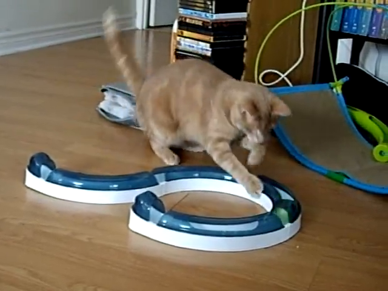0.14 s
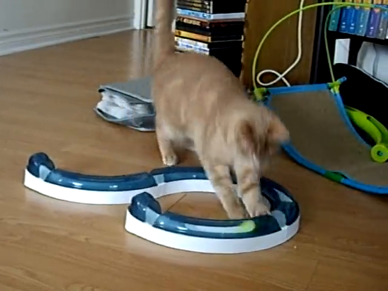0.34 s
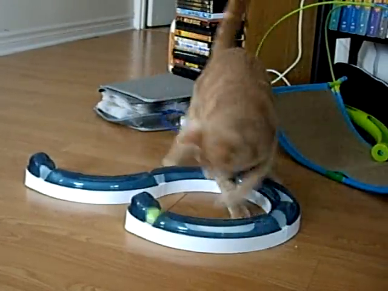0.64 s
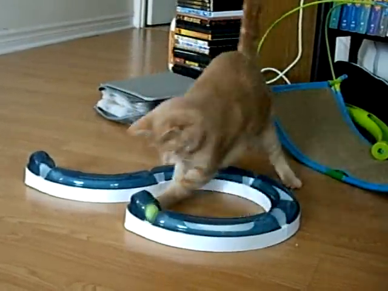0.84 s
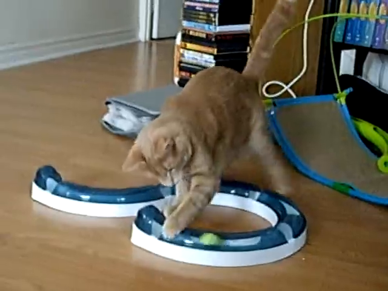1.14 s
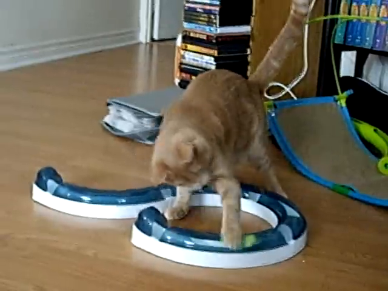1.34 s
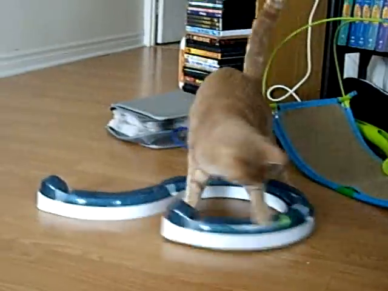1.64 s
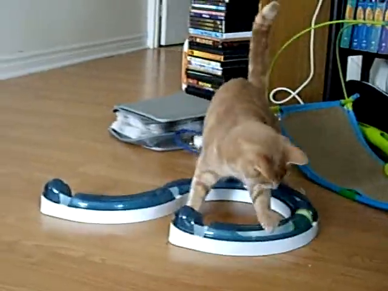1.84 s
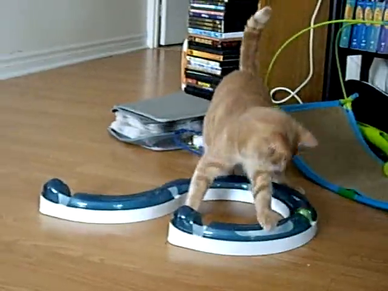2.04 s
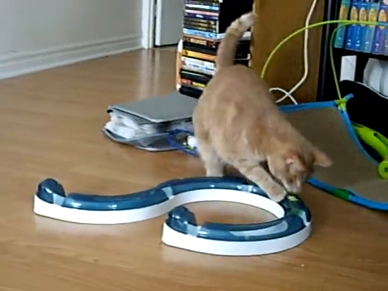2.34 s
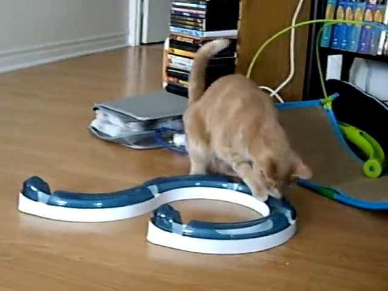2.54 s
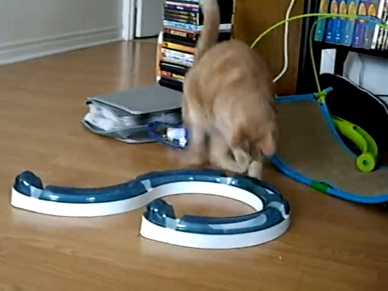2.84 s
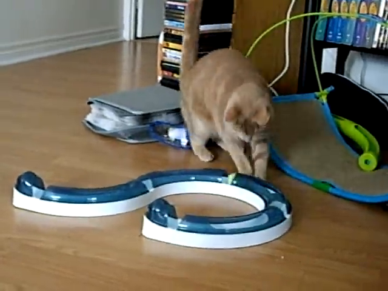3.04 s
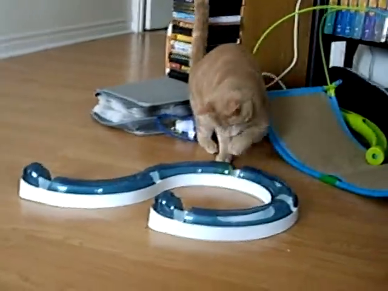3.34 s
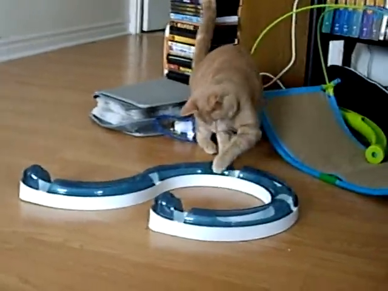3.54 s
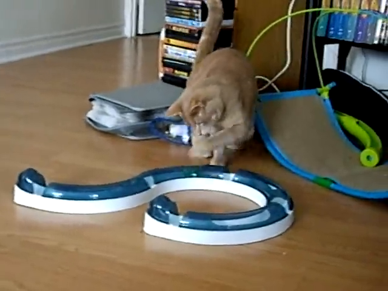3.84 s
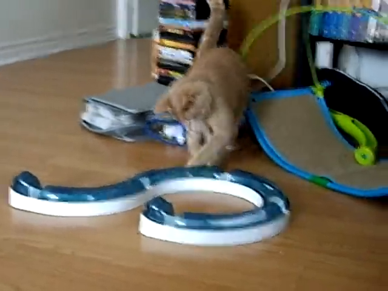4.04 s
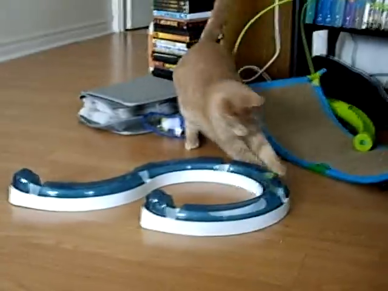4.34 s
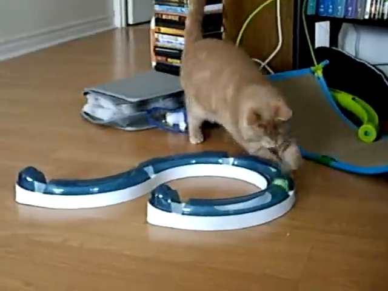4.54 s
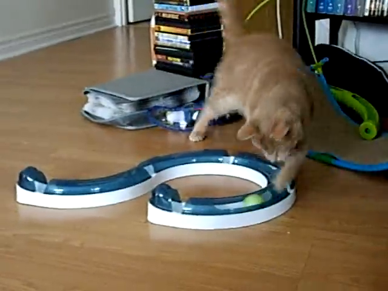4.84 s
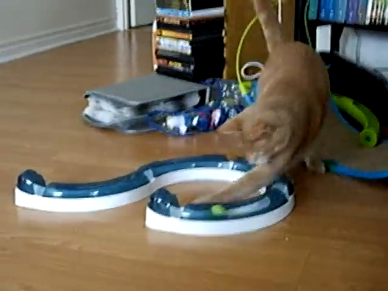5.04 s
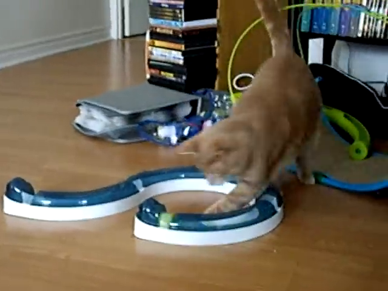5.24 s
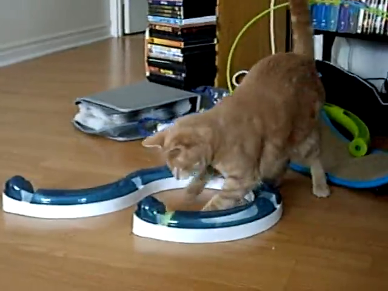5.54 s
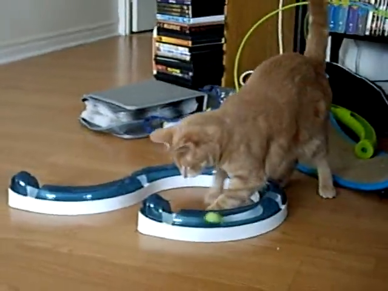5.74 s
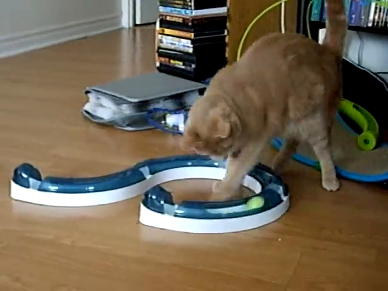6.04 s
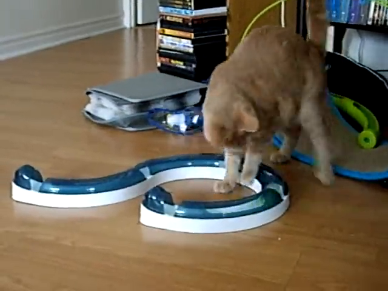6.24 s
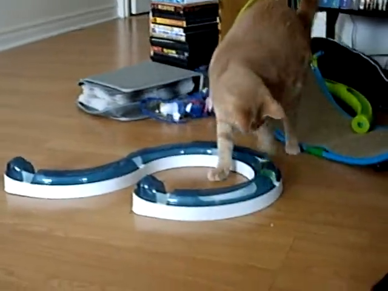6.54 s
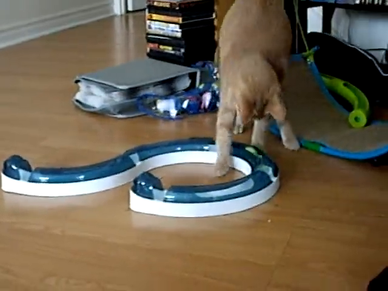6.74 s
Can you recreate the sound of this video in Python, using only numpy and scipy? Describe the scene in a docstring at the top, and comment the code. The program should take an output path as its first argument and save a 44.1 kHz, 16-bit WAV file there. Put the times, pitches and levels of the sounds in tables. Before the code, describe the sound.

A low, slightly wavering hum, soft hiss and a very thin high whine continue throughout in a small, hard-floored room. From 0 to 0.5 s light plastic taps and a faint rolling rattle lead to a firmer knock at 0.45. Paw scuffs and quick ticks cluster at 0.76-0.9. Hard hollow clacks hit at 1.32 and 1.48, then the strongest rattling, scraping burst at 1.8. Small taps fade after 2.0; 2.3-2.8 is nearly only hum. A faint scuff near 2.9 and light ticks at 3.1 precede sharp knocks at 3.33 and 3.53. Smaller taps follow, then a busy clattering run at 4.26-4.48, with rolling chatter. After 4.5 it thins to weak rolling; the hum swells around 5.3-5.8, with tiny taps at 5.25, 5.36, 5.66 and 6.7. The small camera microphone dulls the treble; the hardest hits bring little overload clicks.

```python
"""A light ball, batted by a cat, knocks round a hollow plastic track on a hard floor indoors. Each knock
rings the track and starts with a bright tick; many small clicks make the rolling rattle, and uneven grains
make the paw scuffs. A room echo follows. Behind lie a low room hum and a small camera's hiss and thin whine.
After some of the knocks the baseline of the signal drops by whole notches and clicks back up one at a time."""
import sys
import numpy as np
from scipy import signal
from scipy.fft import rfft, irfft, next_fast_len
from scipy.io import wavfile

SR = 44100
rng = np.random.default_rng(int(sys.argv[2]) if len(sys.argv) > 2 else 0)


def unload_wav(signal):
    """Save mono or channel-first audio to the path in sys.argv[1] as 16-bit WAV at rate SR, clipped to [-1, 1]."""
    wavfile.write(
        sys.argv[1],
        SR,
        np.round(np.clip(np.atleast_2d(signal).T, -1, 1) * 32767).astype(np.int16),
    )


def gain_from_db(level_db):
    """Turn a decibel level (scalar or array-like) into a linear amplitude factor."""
    decades = np.asarray(level_db, float) / 20
    return 10 ** decades


N = 304334  # length in samples

# knocks of ball and paw on the track:
# (time [s], wall peak [dB], hollow peak [dB], tick peak [dB], wall colour [Hz])
KNOCK_EVENTS = [(0.053, -30, -39, -50, 1210), (0.084, -24.5, -52, -28, 2060),
                (0.1333, -26.5, -40.5, -42, 1220), (0.3035, -27.5, -39, -42, 1380),
                (0.4154, -25, -48, -36, 1380), (0.4473, -15, -41, -41, 880), (0.464, -41, -32.5, -38, 1300),
                (0.7621, -24, -42, -35, 1750), (0.7844, -20.5, -39, -35, 1850),
                (0.8655, -18.5, -45, -24, 1490), (0.8809, -19, -44, -30, 1680),
                (0.9004, -27, -44, -35, 1360), (1.0401, -29, -36, -37, 1700), (1.1766, -32, -48, -33, 1370),
                (1.194, -40, -39, -29.5, 1230), (1.228, -30, -37, -42, 1280),
                (1.3249, -8, -24.5, -18.5, 1540), (1.4615, -17.5, -44, -45, 1160),
                (1.4657, -16.5, -51, -39, 1060), (1.4773, -4.5, -18, -6, 1330),
                (1.5849, -23.5, -31, -40, 920), (1.685, -24.5, -49, -39, 1090),
                (1.742, -23, -38, -32, 1370), (1.797, -27, -43, -31, 1350),
                (1.8064, -3.5, -31.5, -31, 1490), (1.832, -9, -35, -24, 1750), (1.855, -16, -35, -32, 1470),
                (2.0121, -28, -28.5, -35, 975), (2.0222, -36, -59, -24.5, 1340),
                (2.0867, -42, -43, -34, 1660), (2.2415, -28, -43, -46, 1110), (3.1108, -29, -58, -20, 2180),
                (3.202, -47, -48, -32, 1230), (3.3263, -5.5, -23, -17.5, 1150), (3.51, -32, -41, -29, 1370),
                (3.515, -15, -40, -21, 1060), (3.529, -6.5, -25, -2.5, 890),
                (3.6602, -18, -38, -25.5, 1600), (3.67, -27, -42, -36, 1490),
                (3.8672, -28, -35.5, -22, 1630), (4.057, -18.5, -39, -32, 1090),
                (4.1384, -36, -44, -33, 1600), (4.214, -44, -42, -29.5, 1820),
                (4.258, -19.5, -36, -28, 1700), (4.3257, -8, -23.5, -16, 885),
                (4.3738, -29, -27, -24.5, 1350), (4.393, -32, -24, -20.5, 1020),
                (4.449, -18, -26, -13, 1210), (4.47, -23, -49, -24, 1220), (4.4808, -14, -28.5, -25, 770),
                (5.2513, -46, -38, -24.5, 2780), (5.3625, -31.5, -58, -35, 1390),
                (5.6552, -31, -61, -49, 1360), (6.7017, -41, -43, -27, 1170)]
# tones of the hollow track: (frequency [Hz], relative level [dB], share of the ring time [ratio])
TRACK_MODES = [(395, -2, 3.3), (533, 3, 1.4), (690, 6, 0.76), (833, 1.5, 1.24), (1060, 3.5, 0.91),
               (1282, 3.5, 0.84), (1490, 3, 0.73), (1750, -1, .8), (2134, 0, 0.96), (2450, 6, 0.74),
               (2760, 11, 0.21), (3250, -9, 0.98)]
# how briskly the ball rolls, as its rattle: (time [s], level [dB])
ROLLING_LEVEL = [(0.0, -50.5), (0.2, -49), (1.1, -51), (1.45, -55), (1.6, -49.5), (1.748, -36), (1.8, -49),
                 (2.0, -46.5), (2.18, -63), (2.4, -56), (2.85, -66), (3.62, -70.5), (3.73, -52),
                 (4.04, -55), (4.19, -48.5), (4.32, -39.5), (4.42, -51), (4.87, -55), (5.22, -51.5),
                 (5.4, -52), (5.52, -58.5), (6.9, -59.5)]
# a swat makes the ball chatter for a moment: (time [s], peak level [dB], time to fall 10 dB [s])
SWAT_EVENTS = [(0.094, -45.5, 0.3), (0.457, -33.5, 0.08), (0.795, -33.5, 0.036), (0.896, -35, 0.05),
               (0.96, -44.5, .15), (1.189, -42.5, 0.09), (1.475, -30, 0.0172), (1.527, -45.5, 0.14),
               (1.817, -20, 0.0332), (1.87, -31, 0.0581), (2.025, -46, 0.06), (2.895, -43, .065),
               (3.099, -52.5, 0.08), (3.221, -55, 0.35), (3.334, -51, 0.1), (3.527, -26, 0.0223),
               (3.684, -43.5, 0.05), (4.069, -36, 0.02), (4.149, -40.5, 0.08), (4.486, -38, 0.06)]
# strokes of the paw; those with a zero or negative fall time make no sound:
# (time [s], peak level [dB], time to fall 10 dB [s], claws against fur [dB])
PAW_STROKES = [(0.084, -41, 0.06, -9.5), (0.445, -43.5, .05, -11), (0.784, -48, 0.04, -15),
               (0.882, -44, 0.04, -5), (0.919, -35.5, 0.0463, -7.5), (0.97, -50, 0.06, -6),
               (1.33, -51.5, 0.06, -1), (1.475, -48, 0.04, 4), (1.527, -53, .12, -0.5),
               (1.735, -45.5, 0.1, -17), (1.811, -22.5, 0.0122, -16), (1.84, -35, .07, -9),
               (2.024, -50, 0.1, 1), (2.401, -61, -0.02, 13), (2.895, -55, 0.2, -13),
               (3.067, -44, 0.06, -13), (3.095, -48.5, .03, 7.5), (3.21, -57, -0.06, 9.5),
               (3.323, -52, .018, 2), (3.364, -54, 0.14, 0.5), (3.529, -35, .012, 2), (3.545, -51, 0.01, 9),
               (3.672, -42.5, .016, 1.5), (3.73, -54.5, 0.35, 5.5), (4.06, -43, 0, -17),
               (4.146, -40.5, 0.05, -5), (4.29, -50, 0.16, -5), (4.436, -50, 0.01, 6),
               (4.486, -55, 0.07, 6), (5.262, -47.5, 0.07, -5.5), (5.378, -53, 0.07, -12),
               (6.712, -56.5, -0.1, 6.5)]
# tone colour of the scuffs: (frequency [Hz], relative level per Hz [dB])
SCUFF_COLOUR = [(1180, -45), (2000, -8), (3060, -4.5), (3430, -5.5), (4040, -5), (4390, -8.5), (6170, -6.5),
                (8500, -12), (11000, -41.5), (18700, -120)]
# tone colour of the room and camera hiss: (frequency [Hz], relative level per Hz [dB])
HISS_COLOUR = [(120, -34), (200, -4), (213, -12.5), (489, -11.5), (537, -22.5), (581, -14.5), (1010, -22.5),
               (1200, -21), (1660, -28.5), (3820, -14.5), (6410, -31.5), (7270, -21.5), (8500, -30.5),
               (11000, -63), (18700, -120)]
# low room hum as noise in resonances: (frequency [Hz], width [Hz], level [dB])
HUM_RESONANCES = [(28.8, 13, -48.5), (97.1, 37, -50.5), (123.9, 13.8, -52.5), (156, 11, -61),
                  (185.8, 23.3, -54), (302, 2.4, -69), (360, 13, -63.5), (472, 74, -67.5)]
# the strongest hum tone swells and fades: (time [s], level [dB])
DRONE_LEVEL = [(0.0, -51), (0.35, -53.5), (0.71, -46.5), (1.15, -52), (2.02, -51.5), (2.58, -46.5),
               (2.98, -55.5), (3.48, -48), (3.8, -61), (4.2, -46), (4.57, -53.5), (4.96, -45.5), (5.3, -41),
               (5.84, -38.5), (5.98, -46.5), (6.9, -46.5)]
# baseline drops after some knocks: (time [s], size [notches], wait until the first climbs back [s])
BASELINE_DROPS = [(1.4786, 3, .0325), (1.47995, 1, .12585), (1.8065, 1, .0842), (3.3274, 3, .0328),
                  (3.529, 3, .0338), (4.3249, 1, .0338), (4.449, 1, .0375)]


def knocks():
    """Each knock rings the wall tones near its colour and the hollow below them, led by a bright tick."""
    reach_octaves = 0.47  # how far from its colour a knock still excites the wall
    wall_t60, hollow_t60, tick_t60 = 0.022, 0.036, 0.012  # seconds to fall 60 dB, before each tone's share
    size = SR // 5
    out, t = np.zeros(N + size), np.arange(size) / SR
    hz, level_db, share = np.transpose(TRACK_MODES)[:, :, None]
    hollow = hz[:, 0] < 600
    ring_s = np.where(hz < 600, hollow_t60, wall_t60) * share
    decay = gain_from_db(-60 * t / ring_s)
    for s, peak_db, hollow_db, tick_db, colour_hz in KNOCK_EVENTS:
        # the sharper a knock (tick over wall), the higher its tick
        sharpness_db = np.clip(tick_db - peak_db, -25, 6)
        tick_hz = 5250 * 2 ** (0.012 * sharpness_db)
        near_db = -6 * (np.log2(hz / colour_hz) / reach_octaves) ** 2 * ~hollow[:, None]
        # every spot of the track rings a little differently
        detune = 1 + 0.02 * rng.standard_normal(hz.shape)
        strength = gain_from_db(level_db + near_db + 2 * rng.standard_normal(hz.shape))
        modes = strength * decay * np.sin(2 * np.pi * hz * detune * t)
        hollow_ring = modes[hollow].sum(axis=0)
        # one clear touch, then a little shudder
        contact = rng.standard_normal(size // 8) * gain_from_db(-22 - 60 * t[:size // 8] / 0.015)
        contact[0] = 1
        wall = signal.fftconvolve(modes[~hollow].sum(axis=0), contact)[:size]
        crack = rng.standard_normal(size) * gain_from_db(-60 * t / tick_t60)
        crack[0] = 0.96  # a hard edge leads the crackle
        band = signal.butter(2, [0.52 * tick_hz, 1.48 * tick_hz], "band", fs=SR, output="sos")
        tick = signal.sosfilt(band, crack)
        at = round(s * SR)
        for part, db in ((wall, peak_db), (hollow_ring, hollow_db), (tick, tick_db)):
            out[at:at + size] += gain_from_db(db) * part / np.abs(part).max()
    return out[:N]


def rattle(rolling_db):
    """The rolling ball chatters on the seams: dense clumped clicks dealt to the track's tones."""
    tilt_db = -7  # rolling favours the middle tones, dB per octave squared
    clicks = grains(2500 * gain_from_db(3.0 * drift(25)), 1.4)
    dealt = rng.integers(0, len(TRACK_MODES), N)
    rings = np.zeros(N)
    for k, (hz, db, share) in enumerate(TRACK_MODES):
        gain = gain_from_db(db + tilt_db * np.log2(hz / 1200) ** 2)
        rings += gain * ring(clicks * (dealt == k), hz, 0.014 * share)
    swat_power = bursts(*np.transpose(SWAT_EVENTS), rise=0.29)
    return np.sqrt(gain_from_db(2 * rolling_db) + swat_power) * rms_one(rings)


def scuff(rolling_db):
    """Fur and claws drag over plastic: fine uneven grains, claws brighter than fur."""
    split_hz, rise = 4800, 0.37  # fur below the split, claws above; rise time as a share of the fall time
    drag = coloured(grains(5000 * gain_from_db(2.8 * drift(40)), 2.76), SCUFF_COLOUR)
    dull = signal.sosfiltfilt(signal.butter(3, split_hz, fs=SR, output="sos"), drag)
    s, db, fall_s, claws_db = np.transpose(PAW_STROKES)
    # faint unbroken shuffling, livelier while the ball rolls
    shuffle = gain_from_db(-63 + 0.35 * (rolling_db - rolling_db.mean()))
    fur = np.sqrt(shuffle ** 2 + bursts(s, db, fall_s, rise))
    claws = np.sqrt((shuffle * gain_from_db(1.5)) ** 2 + bursts(s, db + claws_db, fall_s, rise))
    return fur * rms_one(dull) + claws * rms_one(drag - dull)


def room(x):
    """Room echo: eight feedback delays, duller on every round."""
    t60_s, wall_cut_hz = 0.32, 2400  # time for the lows to fall 60 dB; treble loss on each round
    size = next_fast_len(N + SR)
    turn = np.exp(-2j * np.pi * np.fft.rfftfreq(size))  # a delay of one sample
    dull = np.exp(-2 * np.pi * wall_cut_hz / SR)
    echoes = 0
    for k, lag in enumerate((rng.uniform(0.008, 0.035, 8) * SR).astype(int)):
        loop = gain_from_db(-60 * lag / SR / t60_s) * (1 - dull) / (1 - dull * turn) * turn ** lag
        echoes = echoes + (-1) ** k * loop / (1 - loop)
    return irfft(rfft(x, size) * echoes, size)[:N]


def room_tone():
    """Steady background: hiss, hum as noise in resonances, a swelling drone and the camera's whine."""
    drone_hz, drone_waver_hz, whine_hz = 75.6, 3.6, 7380
    hiss = gain_from_db(-51.5 + 0.5 * drift(0.96)) * coloured(rng.standard_normal(N), HISS_COLOUR)
    hum = sum(gain_from_db(db) * narrow_noise(hz, width_hz) for hz, width_hz, db in HUM_RESONANCES)
    phase = 2 * np.pi * np.cumsum(drone_hz + drone_waver_hz * drift(2.5)) / SR
    drone_db = in_time(DRONE_LEVEL)[0] + 2.0 * drift(6.1)
    drone = gain_from_db(drone_db) * np.sqrt(2) * np.sin(phase)
    whine = gain_from_db(-62) * np.sqrt(2) * np.sin(2 * np.pi * whine_hz * np.arange(N) / SR)
    whine_skirt = gain_from_db(-72.5) * narrow_noise(whine_hz, 120)  # soft noise around the whine
    return hiss + hum + drone + whine + whine_skirt


def rms_one(x):
    """Scale to an rms (average strength) of 1."""
    return x / np.sqrt(np.mean(x ** 2) + 1e-20)


def in_time(rows):
    """Draw a curve through the rows: each column after the time, with one value per sample."""
    s, *columns = np.transpose(rows)
    return [np.interp(np.arange(N) / SR, s, c) for c in columns]


def drift(rate):
    """Slow random wandering with a spread of 1; a higher rate [Hz] wanders faster."""
    r = np.exp(-80 * np.pi * rate / SR)  # worked out on every 40th sample
    slow = signal.lfilter([1], [1, -2 * r, r * r], rng.standard_normal(N // 40 + 2002))[2000:]
    return np.interp(np.arange(N) / 40, np.arange(len(slow)), rms_one(slow))


def ring(clicks, hz, t60):
    """A resonance: a click of size 1 sets a sine of height 1 ringing, 60 dB down after t60 seconds."""
    r, w = gain_from_db(-60 / (t60 * SR)), 2 * np.pi * hz / SR
    return signal.lfilter([0, np.sin(w)], [1, -2 * r * np.cos(w), r * r], clicks + 1e-18)


def coloured(x, spectrum):
    """Give a flat signal a tone colour by weighting its frequencies; rms 1."""
    hz, level_db = np.transpose(spectrum)
    bins_hz = np.fft.rfftfreq(N, 1 / SR) + 1
    weight_db = np.interp(np.log(bins_hz), np.log(hz), level_db)
    return rms_one(irfft(rfft(x) * gain_from_db(weight_db), N))


def narrow_noise(hz, width_hz):
    """Noise sent twice through a resonance; rms 1."""
    x = rng.standard_normal(N + SR)
    t60 = np.log(1000) / (np.pi * width_hz)
    return rms_one(ring(ring(x, hz, t60), hz, t60)[SR:])  # drop the first second, while it builds up


def grains(per_s, spread_db):
    """Random clicks of very uneven size, per_s of them each second on average."""
    sizes = gain_from_db(spread_db * np.minimum(rng.exponential(1, N), 5)) * rng.choice([-1, 1], N)
    return sizes * (rng.random(N) < per_s / SR)


def bursts(s, db, fall_s, rise):
    """Power of events that swell quickly to a peak and die away; rise is a share of the fall time."""
    t, out = np.arange(N) / SR, np.zeros(N)
    for at, peak_db, fall in zip(s, db, fall_s):
        near = slice(max(0, int((at - 4 * rise * fall) * SR)), int((at + 4 * fall) * SR))
        since = (t[near] - at) / fall
        out[near] += gain_from_db(2 * (peak_db - 10 * np.maximum(since, -since / rise)))
    return out


def scene():
    """Add up the toy, its room echo and the room tone."""
    rolling_db, = in_time(ROLLING_LEVEL)
    toy = knocks() + rattle(rolling_db) + scuff(rolling_db)
    echo = gain_from_db(-25.5) * room(toy)
    return (toy + echo + room_tone())[None]


def notches():
    """How many notches down the baseline sits: falls come in quick succession, rises at an even pace."""
    fall_s, climb_s = 0.00039, 0.02937  # time between one notch and the next, down and up
    steps = np.zeros(N)
    for s, count, hold_s in BASELINE_DROPS:
        order = np.arange(count)
        steps[np.round((s + fall_s * order) * SR).astype(int)] += 1
        steps[np.round((s + hold_s + climb_s * order) * SR).astype(int)] -= 1
    return np.cumsum(steps)


def roll_off(x):
    """The treble ends steeply here."""
    return signal.sosfilt(signal.butter(12, 16970, fs=SR, output="sos"), x)


def record(dry):
    """The level dips with each notch, the offset settles through the coupling, the top is cut, peaks clip."""
    notch, notch_dip_db, settle_s = 0.11, -0.86, 0.097  # step in full scale; level change; settling time
    cutoff_hz, ceiling = 8530, 0.68  # treble limit; clipping height in full scale
    down = notches()
    leak = np.exp(-1 / (settle_s * SR))
    offset = signal.lfilter([1, -1], [1, -leak], -notch * down)
    x = dry * gain_from_db(notch_dip_db * down) + offset
    cut = signal.firwin(301, cutoff_hz, window=("kaiser", 8), fs=SR)
    x = signal.fftconvolve(x, cut[None], mode="same")
    return roll_off(np.clip(x, -ceiling, ceiling))


dry = scene()
out = record(dry)
unload_wav(out)
```